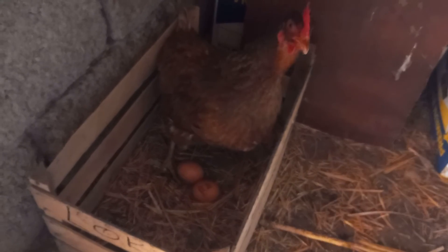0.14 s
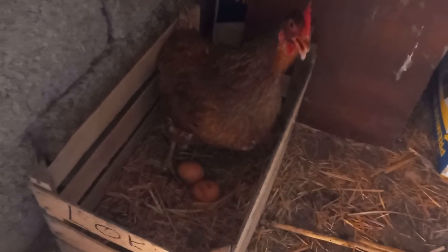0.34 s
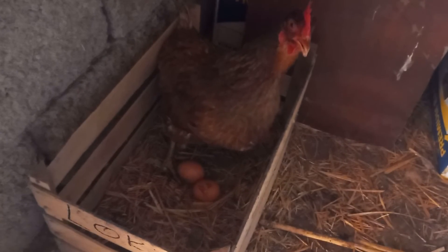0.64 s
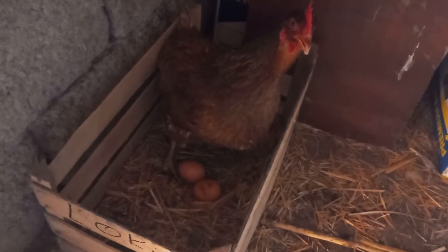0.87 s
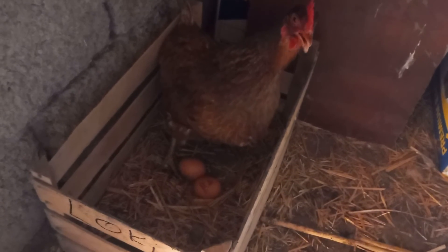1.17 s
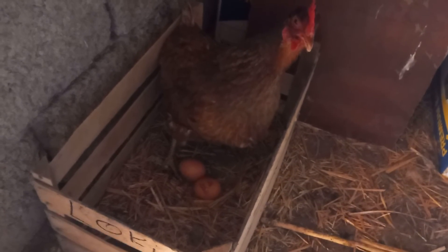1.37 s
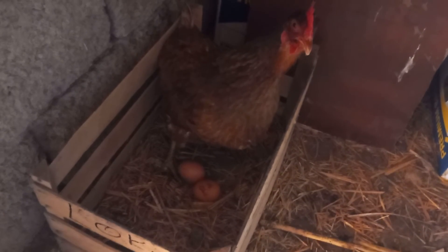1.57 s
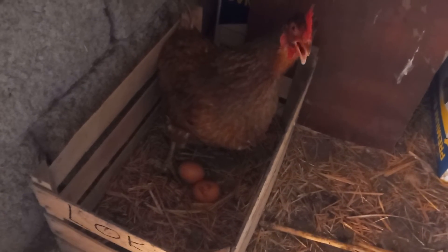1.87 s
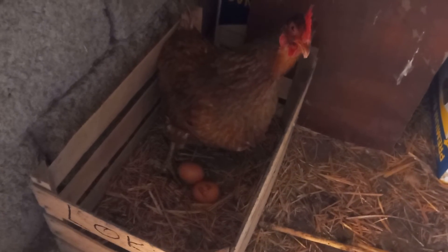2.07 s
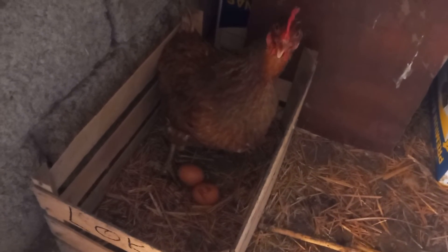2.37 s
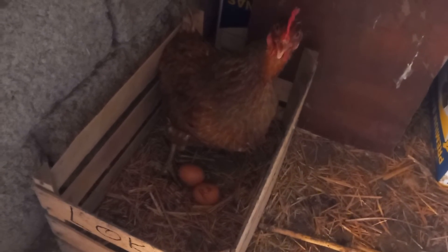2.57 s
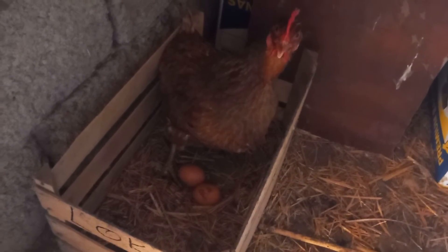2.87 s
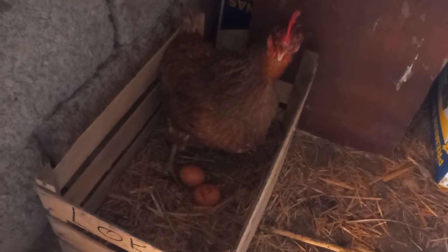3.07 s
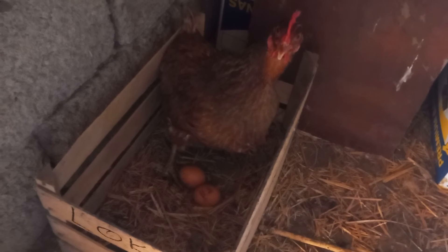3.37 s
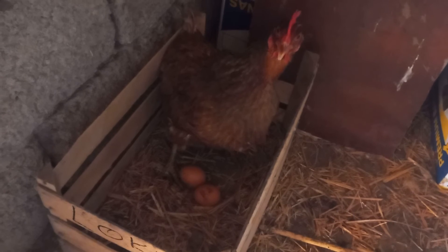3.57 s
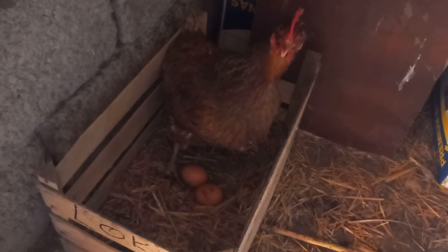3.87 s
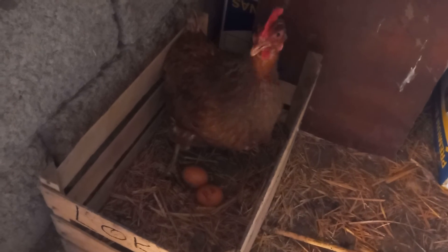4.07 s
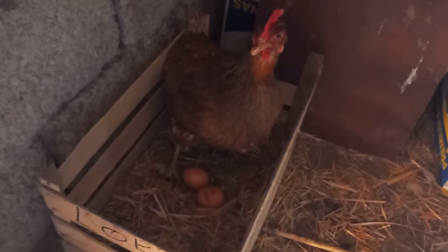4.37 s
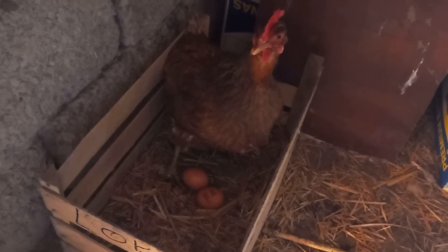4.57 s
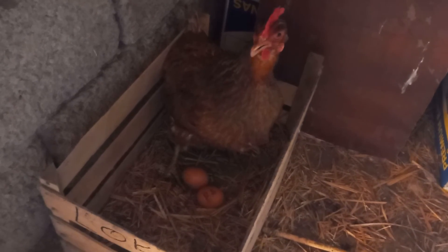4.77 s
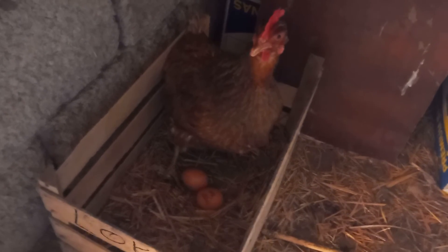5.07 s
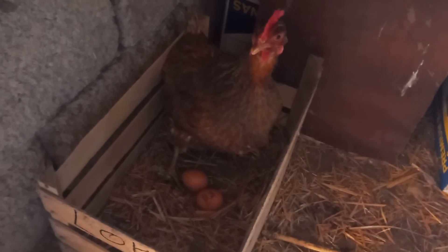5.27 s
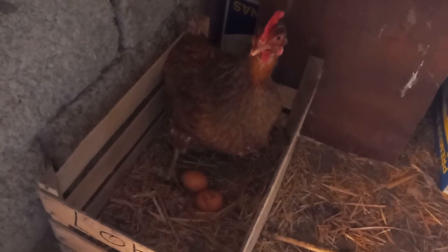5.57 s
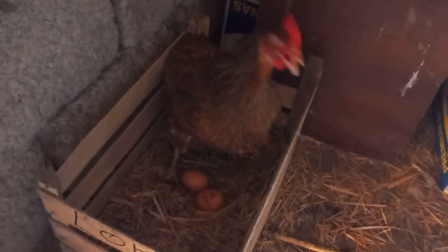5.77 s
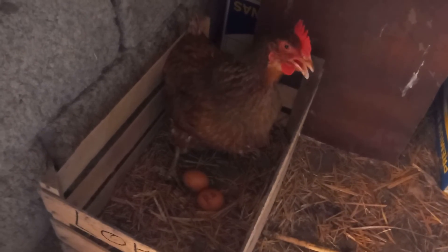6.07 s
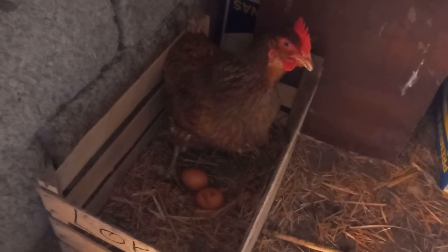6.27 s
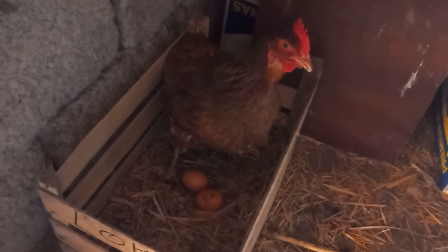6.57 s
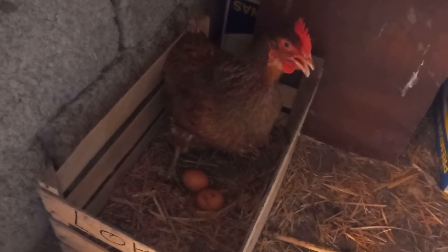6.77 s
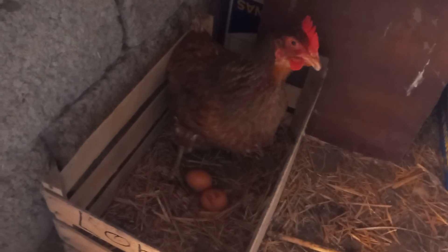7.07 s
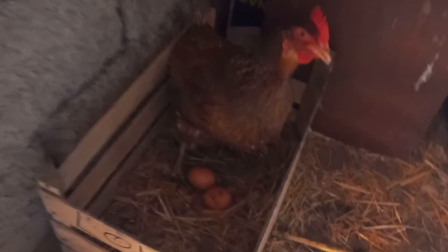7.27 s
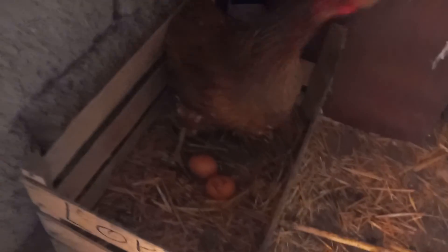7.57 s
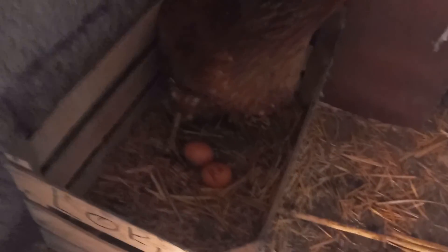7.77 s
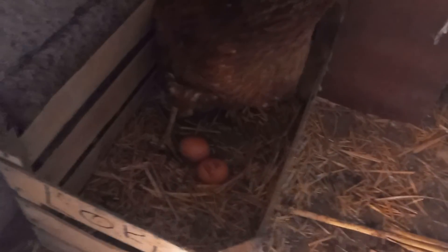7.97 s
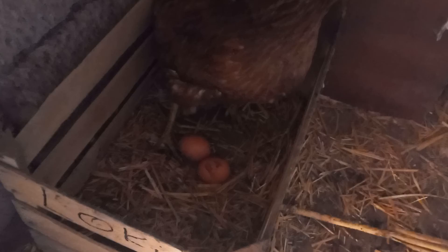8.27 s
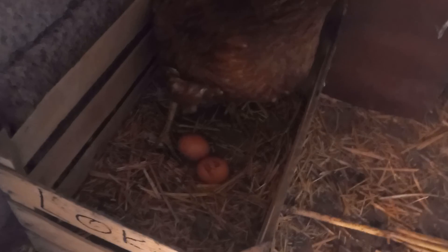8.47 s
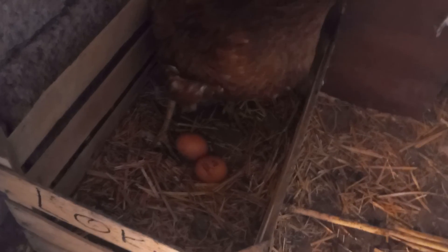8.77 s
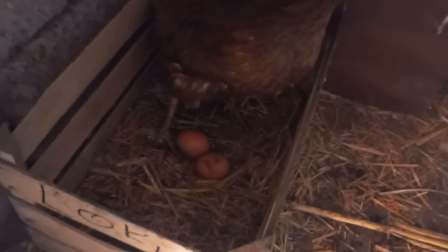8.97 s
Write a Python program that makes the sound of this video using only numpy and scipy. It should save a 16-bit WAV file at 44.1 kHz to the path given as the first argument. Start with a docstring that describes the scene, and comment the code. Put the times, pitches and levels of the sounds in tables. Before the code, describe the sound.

From the start to about 9.2 s, one hen cackles close by in a wooden nest box inside a small shed. Short hoarse clucks, each around a tenth of a second, alternate with longer calls of about a quarter second. Clucks come near 0.05, 0.65, 0.9 and 1.6 s and so on, sometimes in pairs; long calls near 0.3, 1.15, 1.8, 2.4, 3.4, 4.1 and 4.7 s. Each long call begins scratchy, usually tightens into a brief clear rising note, then cracks and dies away. The one at 5.7 s is the most piercing; at 6.7 s it stays almost wholly hoarse. After 7.6 s the clucks are lower and softer, while long calls at 7.9, 8.2 and 8.95 s sound more nasal and open. Tight slat echoes, a short shed tail, and barely audible rumble and hiss surround the bird, slightly right, drifting to centre and back.

```python
"""Cackling hen in a nest box

A hen cackles in a wooden nest box inside a small shed: short hoarse clucks alternate with longer calls.
Her syrinx is a pulse source: it beats irregularly, in most long calls locks into a clean rising note, then breaks up.
Resonances of chest, throat and beak filter the pulses, and a noisy rasp lies on top.
Slat echoes comb the treble, decaying noise makes the shed's answer, and shaped noise a very quiet background."""
import sys
import numpy as np
from scipy import signal
from scipy.fft import rfft, irfft, next_fast_len
from scipy.io import wavfile
from scipy.ndimage import uniform_filter1d, map_coordinates

SR = 44100
rng = np.random.default_rng(int(sys.argv[2]) if len(sys.argv) > 2 else 0)


def transcribe(signal):
    """Save signal, clipped to [-1, 1], as a 16-bit WAV file at the path in sys.argv[1]."""
    frames = np.atleast_2d(signal).T
    limited = np.clip(frames, -1, 1)
    pcm = np.round(limited * 32767).astype(np.int16)
    wavfile.write(sys.argv[1], SR, pcm)


N = 402633
TIME = np.arange(N) / SR

# short clucks: start t/s, length t/s, crest as share of the length, level/dB,
# beak re throat level/dB, rasp re throat level/dB, throat resonance f/Hz
CLUCKS = [ (0.054, 0.12, .55, -22.5, -10.5, -21.5, 1064), (0.648, 0.11, 0.46, -20.5, -12.5, -20.5, 1095),
          (0.907, 0.11, .52, -20.5, -15.5, -25.5, 1110), (1.558, 0.11, 0.35, -20.5, -13, -21.5, 1093),
          (2.167, 0.099, 0.54, -22, -13.5, -23, 1056), (2.861, 0.091, .55, -21.5, -13, -23, 1075),
          (3.114, .12, .6, -23.5, -12, -21.5, 1047), (3.761, 0.13, .46, -20.5, -12, -21, 1075),
          (4.456, 0.097, .55, -22.5, -11, -22.5, 1052), (5.116, 0.087, 0.57, -22, -14, -22.5, 1040),
          (5.438, .102, .52, -24, -13.5, -23.5, 1012), (6.461, .099, 0.56, -24.5, -12.5, -24, 1054),
          (7.042, 0.11, 0.46, -22.5, -10, -23.5, 1047), (7.304, .084, .55, -25, -13, -25, 1048),
          (7.656, 0.1, 0.54, -22.5, -13.5, -30, 862.7), (8.710, 0.099, 0.57, -26.5, -12.5, -25.5, 926), ]
# long calls: a hoarse lead-in, usually a clean note, and a loud break;
# the one at 6.70 s stays almost wholly hoarse, its note lasting only 13 ms:
# start t/s, note begins t/s, note breaks t/s, end t/s, lead-in level/dB, top of the note level/dB,
# break level/dB, ring of the leap level/dB, beak re throat level/dB, rasp re throat level/dB,
# lead-in throat f/Hz, leap throat f/Hz, first pitch f/Hz, top pitch f/Hz, bend (1 = straight climb)
LONG_CALLS = [ (0.309, 0.382, 0.461, 0.535, -22, -20, -17.5, 5.5, -10, -21, 1067, 1149, 488.3, 534, 2.2),
              (1.149, 1.238, 1.317, 1.390, -22, -20.5, -19.5, 3, -7, -19.5, 1056, 1127, 493.1, 523, 2.4),
              (1.803, 1.885, 1.955, 2.025, -21.5, -19.5, -18, 2, -10, -21.5, 1055, 1120, 489, 530.1, 3),
              (2.417, 2.526, 2.594, 2.670, -21, -18, -18, 4.5, -8, -21, 1067, 1162, 479.7, 534, 1.81),
              (3.393, 3.483, 3.573, 3.640, -23, -16, -15, 0.5, -9.5, -21, 1024, 1142, 495, 547, 1.44),
              (4.061, 4.152, 4.210, 4.285, -22, -20, -18, 2.5, -7.5, -19, 1051, 1115, 491.1, 508, 2.13),
              (4.723, 4.85, 4.915, 4.985, -23.5, -17.5, -18, 7.5, -5.5, -20, 1028, 1198, 505, 538.7, 3.96),
              (5.679, 5.796, 5.862, 5.925, -23.5, -13, -16, 1.5, -8, -22.5, 1023, 1092, 511, 569, 1.126),
              (6.04, 6.112, 6.162, 6.225, -21.5, -22, -21, -6.5, -5.5, -21.5, 1041, 1061, 485.5, 513.7, 1.8),
              (6.699, 6.823, 6.836, 6.915, -22.5, -21.5, -19.5, 0.5, -4.5, -19.5, 1038, 1105, 504.7, 514.6, 1.426),
              (7.891, 7.982, 8.043, 8.145, -25, -19.5, -16.5, -2.5, 3, -21, 931, 1250, 497.5, 535.1, 2.02),
              (8.237, 8.303, 8.359, 8.435, -22.5, -23, -18, -6.5, 1.5, -21.5, 1008, 1100, 479.9, 519.4, 2.09),
              (8.946, 9.057, 9.126, 9.200, -26, -19, -15, 1.5, -2.5, -20.5, 926, 1170, 484.2, 550.7, 1.25),
              ]


def amp(db):
    """Level to amplitude: 20 dB is a factor of ten."""
    return 10 ** (np.asarray(db) / 20)


def unit(x):
    """Normalisation to an rms of 1."""
    return x / np.sqrt(np.mean(x ** 2) + 1e-20)


def along(points, hz):
    """Interpolation of (f/Hz, value) points on a logarithmic frequency axis."""
    f, value = np.transpose(points)
    return np.interp(np.log(hz + 1), np.log(f + 1), value)


def curves(rows):
    """Linear interpolation in time: one value per sample for each column after t/s."""
    seconds, *columns = np.transpose(rows)
    return [np.interp(TIME, seconds, column) for column in columns]


def gate(tables, edge):
    """Gating: 1 while one of the tables runs, else 0, with ramps of edge seconds."""
    inside = sum((TIME >= rows[0][0]) & (TIME <= rows[-1][0]) for rows in tables)
    ramped = uniform_filter1d(np.minimum(inside, 1.), max(1, int(edge * SR)))
    return np.clip(ramped, 0, 1)


def trailing(x, seconds):
    """Exponential relaxation: drops of x are drawn out with this time constant."""
    fade = np.exp(-1 / (seconds * SR))
    relaxed = signal.lfilter([1 - fade], [1, -fade], x)
    return np.clip(np.maximum(x, relaxed), 0, 1)


def wobble(rate):
    """Band-limited fluctuation: a smooth random curve with rate knots a second."""
    knots = rng.standard_normal(int(N * rate / SR) + 4)
    return map_coordinates(knots, [TIME * rate])


def filtered(x, response):
    """Linear filtering: the spectrum of x times a response of frequency."""
    m = next_fast_len(N + SR // 2)
    return irfft(rfft(x, m) * response(np.fft.rfftfreq(m, 1 / SR)), m)[..., :N]


def coloured(x, spectrum, size=4096):
    """Minimum-phase filtering: the folded cepstrum gives a causal filter with this spectrum."""
    gain = amp(along(spectrum, np.fft.rfftfreq(size, 1 / SR)))
    cepstrum = irfft(np.log(gain))
    cepstrum[1:size // 2] *= 2
    cepstrum[size // 2 + 1:] = 0
    impulse_response = irfft(np.exp(rfft(cepstrum)))
    return signal.oaconvolve(x, impulse_response)[:N]


def resonate(x, centre_hz, width_hz):
    """A damped resonance by heterodyning: its centre may move, and its gain there is 1."""
    turn = np.exp(2j * np.pi * np.cumsum(centre_hz) / SR)
    pole = np.exp(-np.pi * width_hz / SR)
    return 2 * np.real(turn * signal.lfilter([1 - pole], [1, -pole], x / turn))


def steady(x, span):
    """Level control: the rms over span seconds is held near 1; faster flutter stays."""
    power = uniform_filter1d(uniform_filter1d(x ** 2, int(span * SR)), int(span * SR / 2))
    return x / np.sqrt(np.abs(power) + 1e-12)


def brighten(x, gain_db):
    """High-shelf filtering: the treble rises or falls by a moving gain."""
    treble_hz = 5200
    treble = filtered(x, lambda hz: hz ** 6 / (hz ** 6 + treble_hz ** 6))
    return x + (amp(gain_db) - 1) * treble


def hen(spread=0.061, clean_hollow_hz=2640, treble_lock=0.91):
    """Source-filter principle: the syrinx, hoarse or locked, sounds through chest, throat and beak."""
    # fixed parts of the voice: f/Hz, relative spectrum level/dB
    chest_spectrum = [(100, -30), (190, -15), (270, -8), (385, -13), (440, -4), (490, 1), (560, -1),
                      (670, 0), (750, 1), (820, 6), (900, -2), (1400, -45)]
    beak_spectrum = [(900, -38), (1300, -4.5), (1500, 6.5), (1830, 4), (2100, 1.5), (2350, -1.5),
                     (2750, -3), (3100, -15), (3800, -42.5)]
    rasp_spectrum = [(2000, -48.5), (2900, 6), (3400, 12.5), (3800, 8), (4250, 9.5), (4800, 2), (5700, 2),
                     (6300, -6.5), (7500, -6.5), (8800, -3.5), (10800, -15), (12500, -9), (15500, -12)]
    # neck stretch: t/s, antiresonance f/Hz, its depth before filling in (0-1), beak resonance f/Hz
    neck = [(0, 3280, .75, 1970), (.7, 3240, .75, 2320), (1.6, 3160, .75, 2280), (2.5, 2975, .85, 2379),
            (3.6, 2990, .97, 2373), (5.7, 2928, 1, 2329), (6.5, 3002, .95, 2301), (7.3, 2870, .95, 2270),
            (7.7, 2939, .9, 2055), (8.3, 3151, .85, 2077), (9.1, 3138, .8, 2100)]
    flutter_db, flutter_per_s, wander_hz = 1.16, 90, 26  # of the hoarse throat tone
    gap_drop_hz, gap_fills_per_db = 250, 0.4  # lower on a clean note, shallower when she is loud

    parts, notes = gestures()
    controls = np.array(curves(np.vstack(parts)))
    level_db, beak_db, rasp_db, throat_hz, ring_db = uniform_filter1d(controls, size=160)
    note_hz, = curves([(s, hz / 2) for s, *_, hz, ring in np.vstack(notes)])
    gap_hz, gap_depth, beak_hz = curves(neck)

    # a note gathers out of the hoarseness and crumbles as it breaks
    on_note = gate(notes, edge=0.005)
    gathering = trailing(on_note[::-1], seconds=0.006)[::-1]
    crumbling = trailing(on_note, seconds=0.010)
    locked = np.maximum(gathering, crumbling)

    # the throat stays tuned near the second harmonic
    leaving_note = (crumbling > gathering) * (1 - on_note)
    pitch_hz = note_hz + leaving_note * (throat_hz / 2 - note_hz)
    throat_hz = throat_hz + wander_hz * (1 - locked) * wobble(flutter_per_s)
    hoarse = hoarse_beats(throat_hz / 2, jitter=.24, scatter_db=2.5, flutter_db=1.6, air=0.97)
    clean = clean_beats(pitch_hz, jitter=.005, air=0.11)
    # a clean note is hollow around its fifth harmonic
    clean = clean - .85 * resonate(clean, np.full(N, clean_hollow_hz), width_hz=920)

    def voice(tract, hoarse_db, clean_db, lock=1):
        """Power-preserving crossfade of both kinds of beating through one part of the tract."""
        share = np.clip(lock, 0, 1) * locked
        hoarse_part = amp(hoarse_db) * steady(tract(hoarse), 0.022)
        clean_part = amp(clean_db) * steady(tract(clean), 0.026)
        return np.sqrt(1 - share) * hoarse_part + np.sqrt(share) * clean_part

    def throat_tract(x):
        """Coupled resonances: two close ones in series give a flat top with steep sides."""
        lower = resonate(x, throat_hz * (1 - spread), width_hz=110)
        return resonate(lower, throat_hz * (1 + spread), width_hz=77)

    def beak_tract(x):
        """A moving beak resonance stands out of a fixed spectrum."""
        return coloured(x + 2.0 * resonate(x, beak_hz, width_hz=150), beak_spectrum)

    throat = voice(throat_tract, hoarse_db=0.76, clean_db=0)
    beak = voice(beak_tract, hoarse_db=0.0, clean_db=-2.5)
    rasp = voice(lambda x: coloured(x, rasp_spectrum), hoarse_db=1.0, clean_db=-2.0, lock=treble_lock)
    chest = voice(lambda x: coloured(x, chest_spectrum), hoarse_db=-11.0, clean_db=-10.0)
    # the top of the rasp grows faster than the voice, and a clean note is brighter still
    rasp = brighten(rasp, -0.5 + 0.77 * (level_db + 16.5) + 5 * locked)
    # the low part grows more slowly than the rest as she pushes harder, and thins as a note climbs
    chest_db = -.25 * (level_db + 25.5) - 0.16 * on_note * (pitch_hz - 510)
    ring_db = ring_db + flutter_db * (1 - locked) * wobble(flutter_per_s)
    mix = amp(ring_db) * throat + amp(chest_db) * chest + amp(beak_db) * beak + amp(rasp_db) * rasp
    call = gate(parts, edge=0.012) * amp(level_db) * mix

    # two close antiresonances cut a gap near 3 kHz
    gap_hz = gap_hz - gap_drop_hz * locked
    gap_depth = np.clip(gap_depth - gap_fills_per_db * np.maximum(level_db + 20, 0), 0, 1)
    for notch_hz in (gap_hz - 45, gap_hz + 65):
        call = call - gap_depth * resonate(call, notch_hz, width_hz=230)
    # a small body radiates hardly any bass
    return signal.sosfilt(signal.butter(3, 190, "high", fs=SR, output="sos"), call)


def hoarse_beats(rate_hz, jitter, scatter_db, flutter_db, air):
    """Irregular vibration: pulses uneven in time and strength, each with a puff of turbulence."""
    cycles = np.cumsum(rate_hz * np.exp(jitter * wobble(420))) / SR
    strength = amp(scatter_db * wobble(380) + flutter_db * wobble(120))
    beats = np.diff(np.floor(cycles), prepend=0) * strength
    puffs = signal.lfilter([1], [1, -np.exp(-1 / (0.0013 * SR))], beats)  # 1.3 ms decay
    turbulence = unit(puffs * rng.standard_normal(N))
    return unit(unit(beats) + air * turbulence)


def clean_beats(pitch_hz, jitter, air, count=30):
    """Periodic vibration: nearly even pulses hold count equal harmonics, with a trace of turbulence."""
    phase = 2 * np.pi * np.cumsum(pitch_hz * (1 + jitter * wobble(250))) / SR
    # closed form of a sum of cosines
    stack = np.divide(np.sin((count + .5) * phase), 2 * np.sin(phase / 2)) - .5
    return unit(stack) + air * rng.standard_normal(N)


def gestures():
    """Articulation: all parts in order, and the notes alone, as rows of control values.

    Columns: t/s, level/dB, beak level/dB, rasp level/dB, throat f/Hz, ring level/dB.
    """
    cluck_rise_db, cluck_fall_db = 11.5, 17.5
    lead_shape = (.62, 12, 0.5)  # crest share, rise and fall in dB: a lead-in hardly falls
    parts = [hoarse_burst(start, length, (crest, cluck_rise_db, cluck_fall_db), *tone)
             for start, length, crest, *tone in CLUCKS]
    notes = []
    for (start, locks, breaks, end, lead_db, note_db, break_db, ring_db, beak_db, rasp_db,
         throat_hz, leap_hz, first_hz, top_hz, bend) in LONG_CALLS:
        lead_beak_db = -10 + .35 * beak_db  # the beak is only partly open in the lead-in
        parts.append(hoarse_burst(start, locks - start, lead_shape, lead_db,
                                  lead_beak_db, rasp_db - 3, throat_hz))
        notes.append(clean_note(locks, breaks, note_db, lead_beak_db, beak_db, rasp_db,
                                first_hz, top_hz, bend))
        parts.append(voice_break(breaks, end, break_db, ring_db, beak_db, rasp_db,
                                 2 * top_hz, leap_hz, throat_hz))
    return sorted(parts + notes, key=lambda rows: rows[0][0]), notes


def arch(share, crest, rise_db, fall_db):
    """Parabolic envelope: dB re crest of a swell and fade while share runs from 0 to 1."""
    crest = np.clip(crest, .1, .9)
    rise = rise_db * (1 - share / crest) ** 2
    fall = fall_db * ((share - crest) / (1 - crest)) ** 2
    return -np.where(share < crest, rise, fall)


def hoarse_burst(start, length, shape, level_db, beak_db, rasp_db, throat_hz):
    """Onset transient of a cluck or lead-in: effort arches as the beak opens and the rasp grows."""
    onset_db, onset_s = 16.5, 0.0071  # soft start
    closed_db, opening_s = 8, .016  # the beak opens
    rasp_grows_db, throat_scoop_hz = 6, 34.82  # the throat resonance comes up from below
    share = np.linspace(0, 1, 64)
    t = share * length
    closed = np.exp(-t / opening_s)
    return np.column_stack([
        start + t,
        level_db + arch(share, *shape) - onset_db * np.exp(-t / onset_s),
        beak_db - closed_db * closed,
        rasp_db + rasp_grows_db * (share - .5),
        throat_hz - throat_scoop_hz * closed,
        0 * t])


def clean_note(start, end, level_db, lead_beak_db, beak_db, rasp_db, first_hz, top_hz, bend):
    """Harmonic tuning: the throat rides on the second harmonic as pitch and loudness climb."""
    swell_db_per_hz, dulls_db_per_hz = 0.2, 0.2172  # the climb favours the throat over beak and rasp
    opening_s = 0.0071  # the beak opens further as the note takes hold
    share = np.linspace(0, 1, 64)
    t = share * (end - start)
    below_hz = (top_hz - first_hz) * (1 - share) ** max(bend, .5)
    return np.column_stack([
        start + t,
        level_db - swell_db_per_hz * below_hz,
        beak_db + (lead_beak_db - beak_db) * np.exp(-t / opening_s) + dulls_db_per_hz * below_hz,
        rasp_db + dulls_db_per_hz * below_hz,
        2 * (top_hz - below_hz),
        0 * t])


def voice_break(start, end, level_db, ring_db, beak_db, rasp_db, from_hz, leap_hz, rest_hz):
    """Register break: the throat jumps, mostly up, with a brief rise or dip in level, sags and dies away."""
    fall_db, fall_power = 15.5, 2.23  # it dies away ever faster
    ring_s, sag_s, glide_s = 0.02, .04, .004  # time constants of the ring, the sag and the jump
    share = np.linspace(0, 1, 64)
    t = share * (end - start)
    dull_db = 6 * (share ** 2 - .2)  # beak and rasp fade sooner than the throat
    sag_hz = (leap_hz - rest_hz) * np.exp(-t / sag_s)
    glide_hz = (leap_hz - from_hz) * np.exp(-t / glide_s)
    return np.column_stack([
        start + t,
        level_db - fall_db * share ** fall_power,
        -4.5 + 0.35 * beak_db - dull_db,
        2 + rasp_db - dull_db,
        rest_hz + sag_hz - glide_hz,
        ring_db * np.exp(-t / ring_s)])


def ports(x, lag=.00005):
    """Interaural-type differences: the hen sits to the right, so the left port hears her later and duller."""
    # the head turns: t/s, left minus right level/dB
    head_turns = [(0, -4.5), (1.8, -2), (3.8, 0.5), (4.5, -0.3), (5.8, -1), (6.1, -1), (7.1, -2.3),
                  (7.7, -1.5), (9.1, -4.5)]
    # the voice at the two microphone ports: f/Hz, left minus right level/dB
    port_difference = [(150, -3), (380, 7), (700, -5), (1200, 0), (2400, 0.5), (4400, 0), (8000, -16),
                       (15000, -7.5)]
    sign = np.array([[.5], [-.5]])  # left, right
    pan_db, = curves(head_turns)

    def response(hz):
        """Half of the level difference and half of the lag (s) at each port."""
        return amp(sign * along(port_difference, hz)) * np.exp(-2j * np.pi * hz * lag * sign)

    return amp(sign * pan_db) * filtered(x, response)


def calls():
    """Segmentation: (first, last) samples from just before each call to the next one."""
    starts = sorted(int(row[0] * SR) - 400 for row in [*CLUCKS, *LONG_CALLS])
    return list(zip(starts, starts[1:] + [N]))


def box(x, width_db=-10, glint_db=-6):
    """Comb filtering: the nest box widens the voice, and its slats comb the beamed treble into bands."""
    side = amp(width_db) * slats(x, reach=.007)
    treble = signal.sosfilt(signal.butter(2, 3000, "high", fs=SR, output="sos"), x)
    glint = amp(glint_db) * np.array([slats(treble, reach=.005) for port in ("left", "right")])
    return ports(glint) + np.array([side, -side])


def slats(x, reach, count=8):
    """Early reflections within reach seconds; their paths change from call to call as the head moves."""
    out = np.zeros(N + SR)
    for first, last in calls():
        delays = rng.uniform(.0004, reach, count)
        polarities = rng.choice([-1, 1], count)
        for delay, polarity in zip(delays, polarities):
            out[first + int(delay * SR):][:last - first] += polarity * x[first:last] / np.sqrt(count)
    return out[:N]


def shed(x, delay=.004):
    """Diffuse reverberation: close walls answer with decaying noise that changes as the hen moves."""
    # decay of the shed: f/Hz, t60 t/s
    decay_times = [(150, 0.34), (480, 0.19), (1040, 0.18), (2700, 0.15), (3600, 0.18), (7000, 0.13),
                   (15000, 0.1)]
    # strength of the walls' answer: f/Hz, level/dB
    wall_colour = [(200, 1), (500, 0), (900, -1.5), (3000, -0.5), (7000, 3.5), (15000, 2.5)]
    out = np.zeros((2, N + SR))
    for first, last in calls():
        hz, t, noise = signal.stft(rng.standard_normal((2, SR // 3)), SR, nperseg=256)
        decay = amp(-60 * t / along(decay_times, hz)[:, None])
        tail = signal.istft(noise * decay, SR, nperseg=256)[1]
        answer = signal.fftconvolve(x[None, first:last], tail / np.linalg.norm(tail[0]), axes=1)
        out[:, first + int(delay * SR):][:, :answer.shape[1]] += answer

    def response(hz):
        """Coherence: the ports are close together, so they hear nearly the same bass."""
        turn = np.pi / 4 * hz / (hz + 700)
        return amp(along(wall_colour, hz)) * np.array([np.cos(turn), np.sin(turn)])

    mid, side = filtered(out[:, :N], response)
    return np.array([mid + side, mid - side])


def background(side_db=-8):
    """Spectrally shaped noise: a faint low rumble and hiss with a slowly moving level."""
    # f/Hz, relative spectrum level/dB
    noise_spectrum = [(20, -19), (45, -8), (62, -0.5), (90, -3.5), (120, -7), (170, -20), (400, -31),
                      (1000, -19.5), (3000, -44), (15000, -42.5)]
    # t/s, level/dB
    noise_level = [(0, -74), (2.8, -74.5), (5, -78), (7.3, -78), (8.2, -72.5), (8.7, -80)]
    level_db, = curves(noise_level)
    mid, side = filtered(rng.standard_normal((2, N)), lambda hz: amp(along(noise_spectrum, hz)))
    side = side * amp(side_db)
    return amp(level_db + wobble(2.4)) * unit(np.array([mid + side, mid - side]))


def scene():
    """Superposition of the hen, the answers of box and shed, and the background."""
    voice = hen()
    direct = ports(voice, lag=.000045)
    reflections = box(voice, width_db=-5, glint_db=0.5) + amp(-8.5) * shed(voice)
    return direct + reflections + background()


def record(dry):
    """Band limitation: a steep elliptic low-pass removes what lies above 15750 Hz."""
    return signal.sosfilt(signal.ellip(10, .1, 80, 15750, fs=SR, output="sos"), dry)


dry = scene()
out = record(dry)
transcribe(out)
```